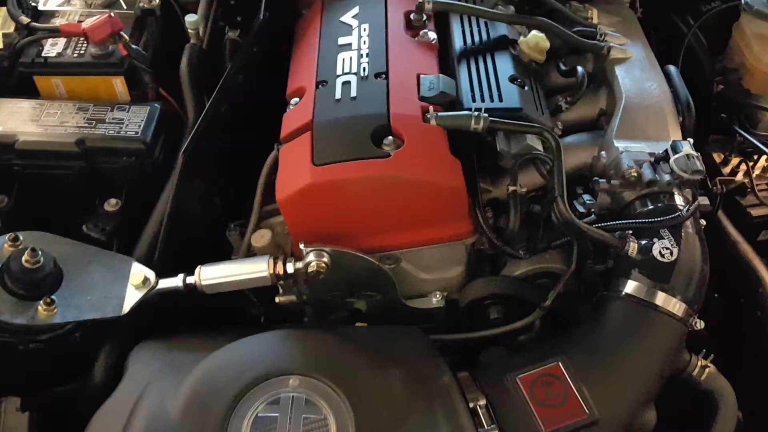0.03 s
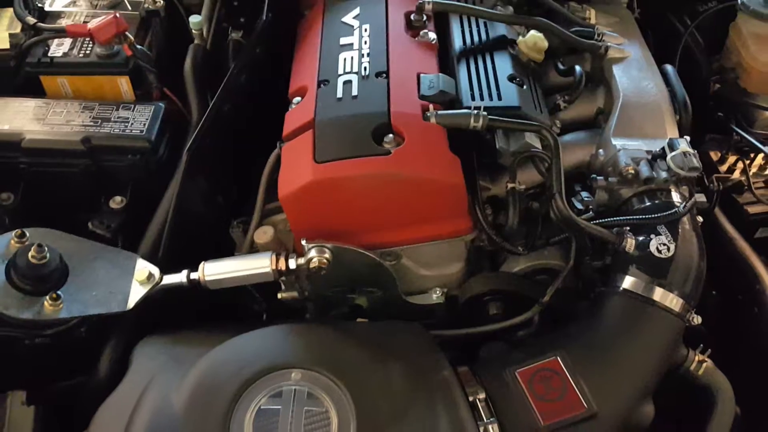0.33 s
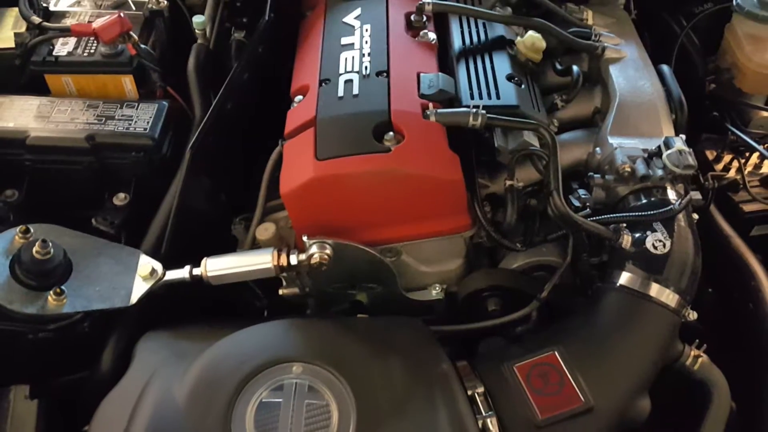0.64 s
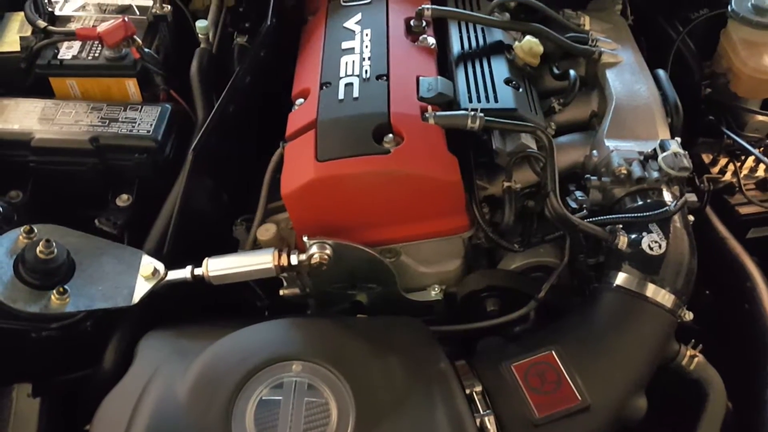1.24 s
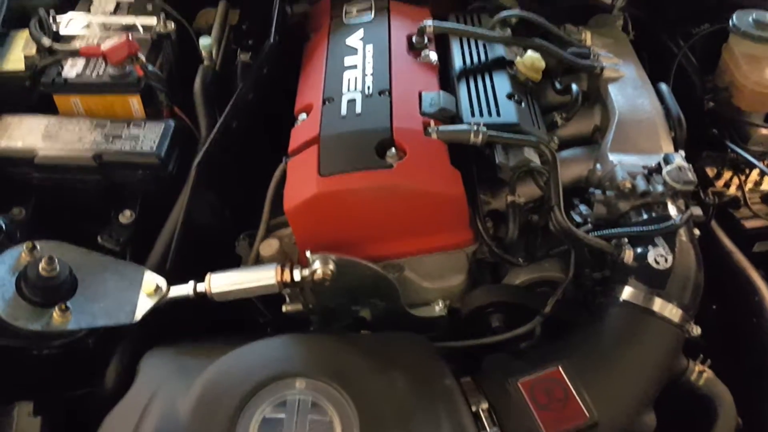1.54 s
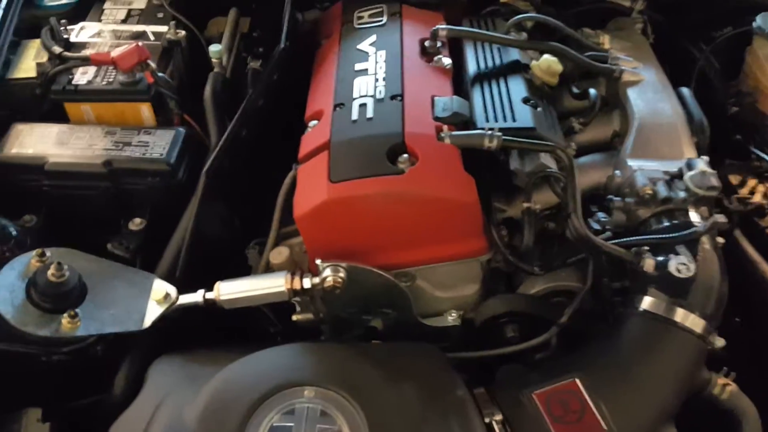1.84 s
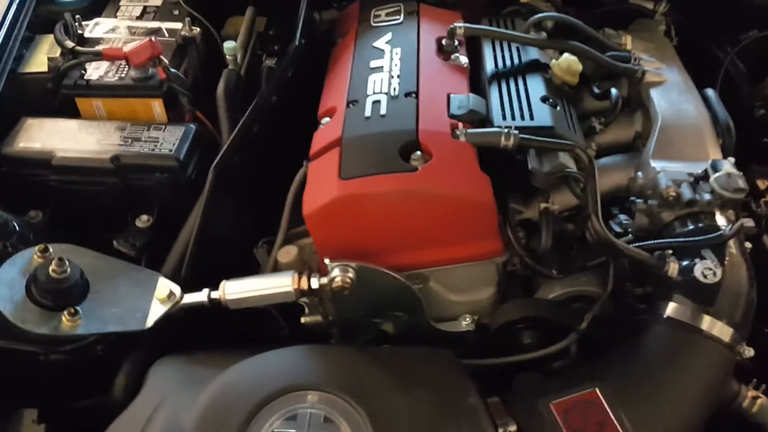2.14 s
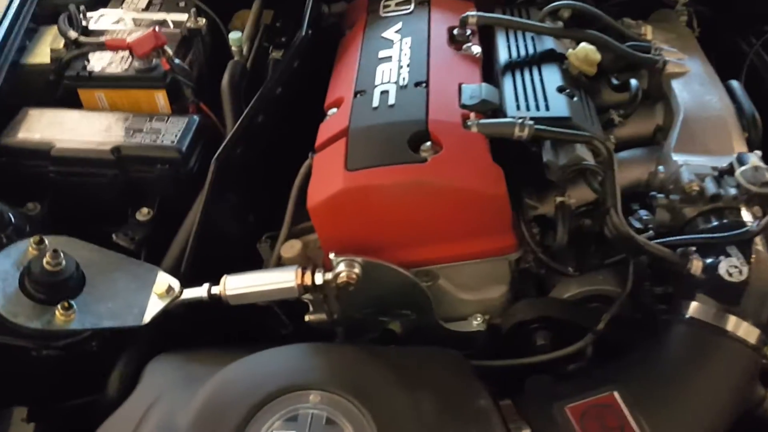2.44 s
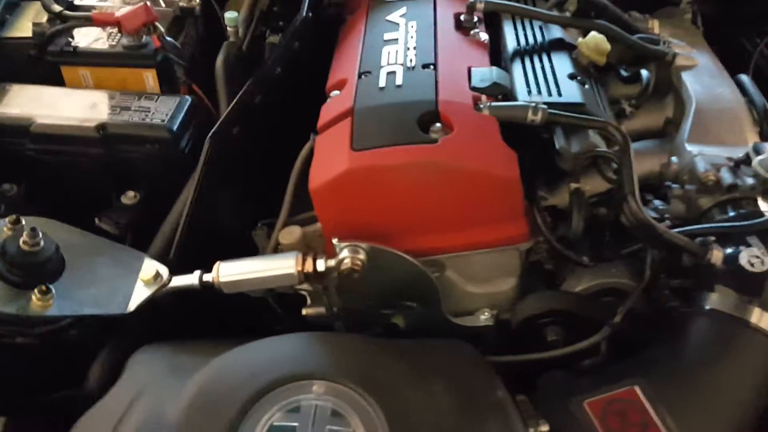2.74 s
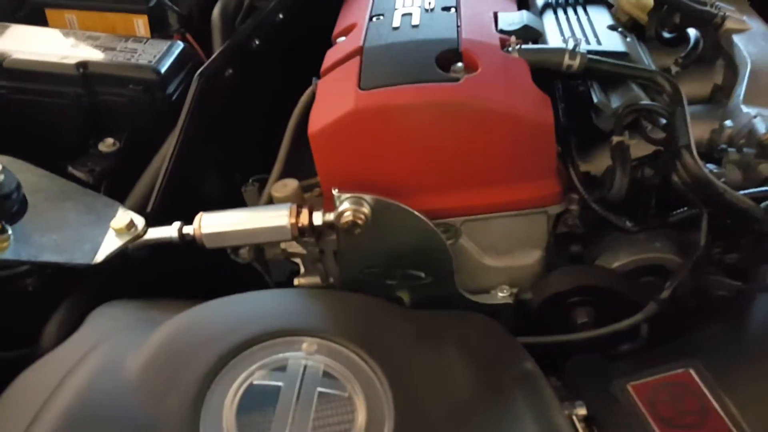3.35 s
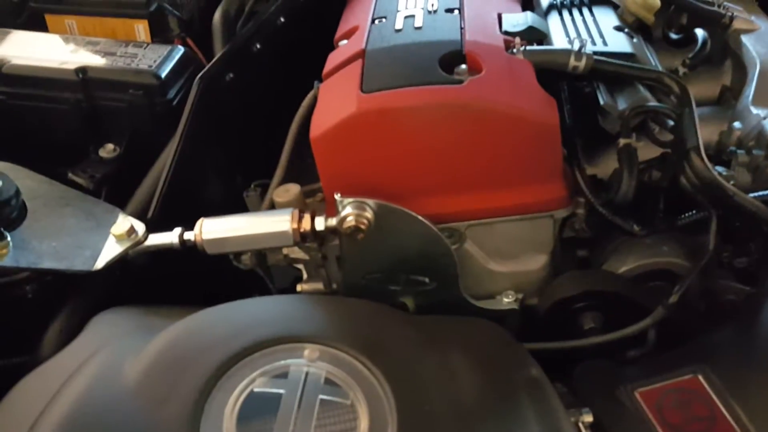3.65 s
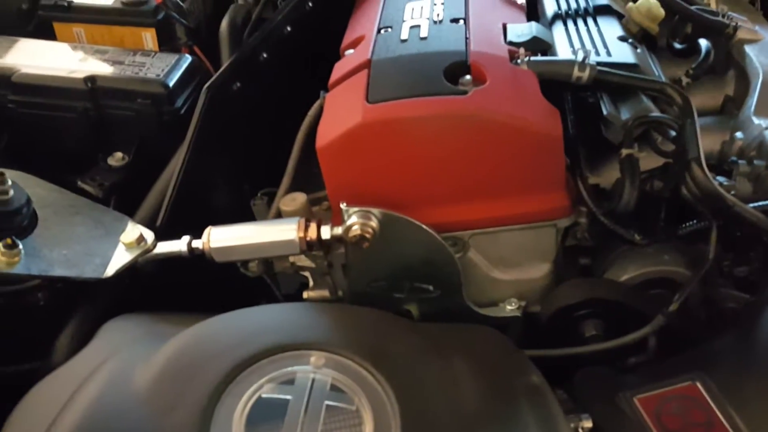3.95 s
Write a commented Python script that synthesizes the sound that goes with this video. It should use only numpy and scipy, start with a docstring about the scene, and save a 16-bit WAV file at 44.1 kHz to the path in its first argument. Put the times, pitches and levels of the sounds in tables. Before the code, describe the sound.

A four-cylinder petrol engine idles steadily, heard from just above the open engine bay. Its low throb carries quick ticking, rattling and a rush of belts, with cooling fans humming and a faint high whine behind.

```python
"""A four-cylinder petrol engine idles under an open bonnet, heard from a phone just above it.
Firings throb and thud in the block; valves and injectors tick in a pattern two crank turns long.
Chain and rockers rattle, belts rush, covers ring. Behind: two fan hums, a pulley note, a thin whine.
The sound fades in; the clatter changes colour as the phone drifts."""
import sys
import numpy as np
from scipy import signal
from scipy.fft import rfft, irfft
from scipy.io import wavfile
from scipy.ndimage import uniform_filter1d

SR = 44100
rng = np.random.default_rng(int(sys.argv[2]) if len(sys.argv) > 2 else 0)


def unload_wav(signal):
    """Save mono or channel-first audio to the path in sys.argv[1] as 16-bit WAV at rate SR, clipped to [-1, 1]."""
    wavfile.write(
        sys.argv[1],
        SR,
        np.round(np.clip(np.atleast_2d(signal).T, -1, 1) * 32767).astype(np.int16),
    )


N = 176400
T = np.arange(N) / SR
BINS_HZ = np.maximum(np.arange(N // 2 + 1) * SR / N, 1)

# whine (time [s], left gain [dB], right gain [dB])
WHINE_GAINS = [(.5, -56, -56), (1.85, -56, -57), (2.05, -55, -43), (2.5, -54, -45), (2.85, -57, -43),
               (3.2, -54, -49), (3.6, -53, -43), (4, -53, -49)]
# fans (time [s], first level [dB], second level [dB], first's left minus right [dB])
FAN_LEVELS = [(.5, -27, -39, 3), (1.2, -28.5, -38, 2), (2.1, -27.5, -41, 2.5), (2.4, -32, -40.5, 2),
              (2.68, -35.5, -40, 5), (2.95, -30, -43, 3.5), (3.25, -26.5, -46, 2.5), (3.55, -23.5, -48, 3),
              (4, -25.5, -42, 2.5)]
# engine bay spectrum (frequency [Hz], gain [dB])
BAY_SPECTRUM = [(200, -20), (440, -15.5), (490, -3.5), (560, -2), (700, -2.5), (900, -6.5), (1150, -2),
                (1300, -4.5), (1570, -5.5), (1680, -4.5), (2050, -3.5), (2900, -7.5), (3500, -7.5),
                (4200, -10), (5200, -13), (6600, -14), (8000, -12), (9000, -11.5), (9900, -20.5),
                (11500, -17), (13000, -22), (14200, -19.5), (16000, -28)]
# covers, brackets, and at 535 Hz a pulley (frequency [Hz], width [Hz], level [dB], cycle swing [dB], swing
# phase [firings])
COVER_MODES = [(489, 15, -44.5, -0.5, 2.5), (535.3, 26, -42.5, 0, 2.9), (661.7, 10, -44.5, 3.5, 2),
               (1035, 40, -35.5, 1.5, 2.9), (1097, 49, -36.5, 0.3, 2.6), (1449, 54, -34.5, 2, 1.2),
               (1664, 25, -46, -1.5, 1.7), (2230, 29, -42, 4.5, 2.6), (2940, 23, -43.5, 0, 2),
               (3950, 72, -41.5, -4, 2), (6100, 40, -51, -5, 2), (8000, 90, -51, 2, 1.8),
               (8840, 290, -47.5, 0.5, 2)]
# running gear bass cut (frequency [Hz], gain [dB])
GEAR_LOW_CUT = [(40, -21), (430, -3), (480, 0)]
# tick spectra (frequency [Hz], gain [dB])
VALVE_SPECTRUM = [(400, -25), (1000, -8.5), (1800, -15.5), (3000, -0.5), (5000, -6.5), (8500, -10.5),
                  (11000, -11.5), (16000, -18)]
INJECTOR_SPECTRUM = [(600, -40), (1800, -6.5), (3000, 2), (4300, 4), (6000, -21.5), (8500, 0), (10500, -11),
                     (16000, -4)]
# idle speed (time [s], rate [firings/s])
FIRING_RATE = [(0.4, 38.84), (0.95, 39.23), (1.35, 38.71), (1.7, 38.86), (2.2, 38.53), (2.55, 38.66),
               (2.9, 38.07), (3.55, 38.38), (4.0, 37.81)]
# cylinder weights in firing order (thud [dB], valve [dB], injector [dB])
CYLINDERS = [(4.5, -6.5, 1.5), (-12, -8.5, 2.5), (13, 2.5, -5), (11.5, -5.5, -5.5)]
# throb (multiple of firing rate [1], amplitude at 1 s [dB])
THROB_HARMONICS = [(1, -35), (2, -23.5), (3, -17.5), (4, -26.5), (5, -43.5), (6, -49), (8, -58.5)]
# block and cover modes (frequency [Hz], width [Hz], gain [dB])
BLOCK_MODES = [(148, 10, -10), (166, 9.3, 9), (184.5, 20, -3), (223, 28, -2), (316.5, 6.6, -7)]
# block rumble (frequency [Hz], gain [dB])
RUMBLE_SPECTRUM = [(30, -38), (60, -11), (90, 3), (130, -1.5), (150, 0), (190, 0.5), (235, -0.5), (265, -6),
                   (310, -1.5), (335, -10.5), (385, -7.5), (420, -30), (700, -50)]
# stereo width (frequency [Hz], side minus mid [dB])
STEREO_WIDTH = [(30, -16), (150, -20.5), (300, -16), (500, -11.5), (750, -8), (1100, -5), (1450, -1),
                (2200, -3), (4000, -1), (16000, 0.5)]
# microphone balance (frequency [Hz], left minus right [dB])
MIC_BALANCE = [(60, -1), (110, 3.5), (200, -0.5), (380, -2), (700, 0), (1290, 2.5), (2380, -0.5),
               (4400, -4.5), (8120, 1.5), (15000, -1.5)]
# reflections off metal parts (frequency [Hz], gain [dB])
ECHO_SPECTRUM = [(900, -13), (2200, -7.5), (4000, -2.5)]
# phone drift, before band trims (time [s], middle [dB], upper middle [dB], treble [dB])
DRIFT_GAINS = [(.5, 2, -0.5, 0.5), (1.3, 1.5, -0.5, .5), (2, 1.5, 0, -1), (2.65, -0.7, 0, -1),
               (3.05, -0.27, 0.1, -1), (3.5, 1.5, -0.1, 0), (4, 0.1, 1, -0.5)]
# fade-in (time [s], gain [dB])
FADE_IN = [(.4, -75), (.412, -25.5), (.44, -17), (.475, -12), (.53, -6), (.6, -3.5), (.68, 0.5)]

CYCLE_FIRINGS = len(CYLINDERS)


def undb(db):
    """Decibels to gain."""
    return 10 ** (np.asarray(db) / 20)


def level(x, db):
    """Scale to an rms level."""
    return x * undb(db) / np.sqrt(np.mean(x ** 2))


def curve(table, column=1):
    """One column of a time table, linearly interpolated."""
    rows = np.array(table, float)
    return np.interp(T, rows[:, 0], rows[:, column])


def bin_gains(points):
    """Gain per FFT bin from (frequency [Hz], gain [dB]) points."""
    hz, db = np.array(points, float).T
    return undb(np.interp(np.log(BINS_HZ), np.log(hz), db))


def colour(x, points):
    """Filter by a spectrum table."""
    return irfft(rfft(x) * bin_gains(points), N)


def resonate(x, hz, width_hz):
    """One band-pass resonance."""
    return irfft(rfft(x) / (1 + 1j * hz / width_hz * (BINS_HZ / hz - hz / BINS_HZ)), N)


def walk(rate_hz):
    """Smooth random wander, rms 1."""
    hold = int(SR / rate_hz)
    steps = np.repeat(rng.standard_normal(N // hold + 1), hold)
    return level(uniform_filter1d(uniform_filter1d(steps, hold), hold)[:N], 0)


def noise(samples=N):
    """Two independent white noises."""
    return rng.standard_normal((2, samples))


def wavering_sine(hz, wander_rad, wander_hz):
    """Sine with a wandering phase."""
    return np.sin(2 * np.pi * hz * T + wander_rad * walk(wander_hz))


def spread(pair):
    """Stereo: alike in the bass, apart in the treble; each microphone favours other bands."""
    ratio = bin_gains(STEREO_WIDTH)
    mid, side = rfft(pair) / np.hypot(1, ratio)
    tilt = np.sqrt(bin_gains(MIC_BALANCE))
    return irfft(np.array([(mid + ratio * side) * tilt, (mid - ratio * side) / tilt]), N)


def drifting_phone(x, moves_s=(2.03, 3.02), move_length_s=.29, echo_decay_s=.0021):
    """Crossfade the close reflections of three resting places; band gains drift."""
    t = T[:int(.008 * SR)]
    bright = colour(x, ECHO_SPECTRUM)
    position = sum(np.clip((T - at_s) / move_length_s + .5, 0, 1) for at_s in moves_s)
    for k in range(len(moves_s) + 1):
        echoes = noise(len(t)) * np.exp(-t / echo_decay_s) * (t > .0003)
        echoes *= undb(-2.5) / np.linalg.norm(echoes, axis=1, keepdims=True)
        weight = np.sqrt(np.clip(1 - abs(position - k), 0, 1))
        x = x + weight * signal.oaconvolve(bright, echoes, axes=1)[:, :N]
    low, to_middle, to_upper = (irfft(rfft(x) / (1 + (BINS_HZ / hz) ** 8), N) for hz in (850, 2600, 5500))
    middle = (to_middle - low) * undb(curve(DRIFT_GAINS, 1))
    upper = (to_upper - to_middle) * undb(curve(DRIFT_GAINS, 2) - 1)
    treble = (x - to_upper) * undb(curve(DRIFT_GAINS, 3) - 2)
    return low + middle + upper + treble


def whine(hz=13964):
    """Thin, unsteady whine, probably electrical: a tone in a narrow noise band."""
    band = level(resonate(noise(), hz, width_hz=27), -8)
    tone = wavering_sine(hz, wander_rad=1.3, wander_hz=60)
    return (band + tone) * undb([curve(WHINE_GAINS, 1), curve(WHINE_GAINS, 2)])


def pulley(hz=954, level_db=-47):
    """Faint, wavering pulley note."""
    amplitude = np.sqrt(2) * undb(level_db + 5.6 * walk(5.1))
    return amplitude * wavering_sine(hz, wander_rad=.93, wander_hz=8)


def fans(first_hz=300.5, second_hz=279.9, second_pan_db=5.3):
    """Blade tones of two electric cooling fans."""
    first = undb(curve(FAN_LEVELS, 1) + walk(15)) * wavering_sine(first_hz, .24, 2.8)
    second = undb(curve(FAN_LEVELS, 2) + 1.1 * walk(11)) * wavering_sine(second_hz, .21, 2.54)
    sides = np.array([[.5], [-.5]])
    return np.sqrt(2) * (first * undb(sides * curve(FAN_LEVELS, 3)) + second * undb(sides * second_pan_db))


def blows(firings, at_firing, scatter_db, jitter_s=.00008):
    """One impulse per engine cycle, slightly uneven in time and size."""
    due_firings = at_firing + CYCLE_FIRINGS * np.arange(44)
    timing, size = rng.standard_normal((len(due_firings), 2)).T
    times_s = np.interp(due_firings, firings, T, right=-1) + jitter_s * timing
    at = (times_s * SR).astype(int)
    inside = (at >= 0) & (at < N)
    return np.bincount(at[inside], undb(scatter_db * size[inside]), N)


def tick(firings, at_firing, decay_s, rise_s=.00066):
    """Metal contact with its own ring, the same on every cycle."""
    t = T[:int(.04 * SR)]
    ring = noise(len(t)) * np.exp(-t / decay_s) * (1 - np.exp(-t / rise_s))
    hits = blows(firings, at_firing, scatter_db=1.15)
    return signal.oaconvolve(hits[None], ring, axes=1)[:, :N]


def running_gear(firings, contacts=28, flare_db=1.5):
    """Chain and rockers rattle, belts and air rush, covers ring with them."""
    at_firings = (np.arange(contacts) + rng.random(contacts)) * CYCLE_FIRINGS / contacts
    rattle = sum(tick(firings, at, decay_s=.0028) for at in at_firings)
    rush = level(colour(noise(), BAY_SPECTRUM), -26)
    gear = level(colour(rattle, BAY_SPECTRUM), -30.5) + rush
    for hz, width_hz, db, swing_db, at_firing in COVER_MODES:
        swing = undb(swing_db * np.cos(2 * np.pi * (firings - at_firing) / CYCLE_FIRINGS))
        drive = (level(rattle, -4.5) + noise()) * swing * undb(flare_db * walk(24.98))
        gear += level(resonate(drive, hz, width_hz), db)
    return colour(gear, GEAR_LOW_CUT)


def valves(firings, offset_firings=.38):
    """Each cylinder's valves seat once per cycle."""
    ticks = sum(undb(db) * tick(firings, k + offset_firings, decay_s=.0083)
                for k, (_, db, _) in enumerate(CYLINDERS))
    return level(colour(ticks, VALVE_SPECTRUM), -36.5)


def injectors(firings, offset_firings=.65):
    """Each cylinder's injector clicks once per cycle."""
    ticks = sum(undb(db) * tick(firings, k + offset_firings, decay_s=.0067)
                for k, (_, _, db) in enumerate(CYLINDERS))
    return level(colour(ticks, INJECTOR_SPECTRUM), -37)


def combustion(firings, lead_firings=.66, rise_db_per_s=.5):
    """Even throb, thuds of four unequal cylinders in the block, rumble swelling with each firing."""
    phase_rad = 2 * np.pi * (firings + lead_firings)
    throb = sum(undb(db) * np.cos(k * phase_rad) for k, db in THROB_HARMONICS)
    throb *= undb(rise_db_per_s * (T - 1))
    thuds = sum(undb(db) * blows(firings, k - lead_firings, scatter_db=3)
                for k, (db, _, _) in enumerate(CYLINDERS))
    block = sum(undb(db) * resonate(thuds, hz, width_hz) for hz, width_hz, db in BLOCK_MODES)
    swell = 1 + .28 * np.cos(phase_rad)
    rumble = spread(colour(noise() * swell, RUMBLE_SPECTRUM))
    return throb + level(block, -35.5) + level(rumble, -31.5)


def scene(start_firings=-3.01, lope_firings=.004):
    """Clatter and combustion follow the crank; fans, pulley and whine run free."""
    firings = start_firings + np.cumsum(curve(FIRING_RATE)) / SR
    firings += lope_firings * np.sin(2 * np.pi * firings / CYCLE_FIRINGS)  # uneven crank speed
    clatter = drifting_phone(spread(valves(firings) + injectors(firings) + running_gear(firings)))
    return combustion(firings) + clatter + fans() + whine() + pulley()


def record(dry):
    """Silence, quick fade-in, steep low-pass."""
    cutoff_hz = 15900
    fade = undb(curve(FADE_IN)) * (T > FADE_IN[0][0])
    low_pass = signal.ellip(10, .2, 80, cutoff_hz, fs=SR, output="sos")
    return signal.sosfilt(low_pass, dry * fade)


dry = scene()
out = record(dry)
unload_wav(out)
```